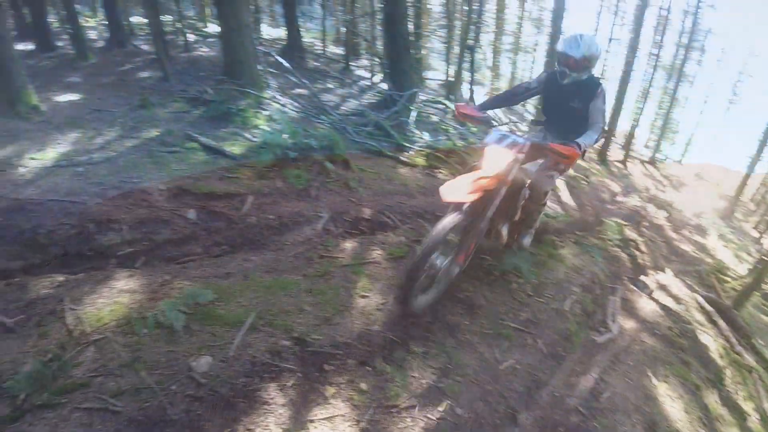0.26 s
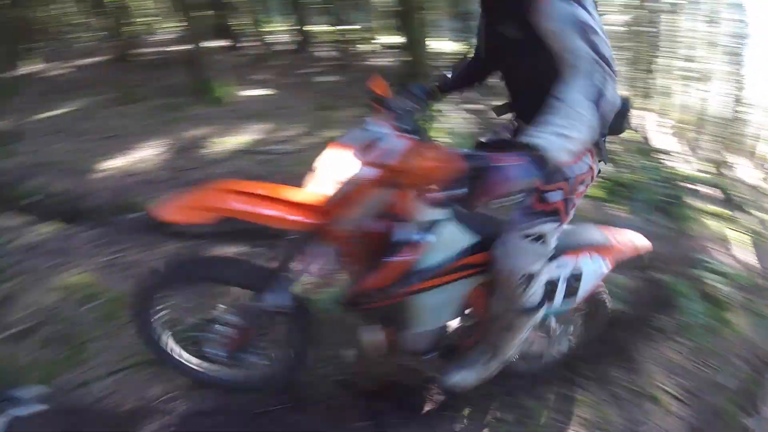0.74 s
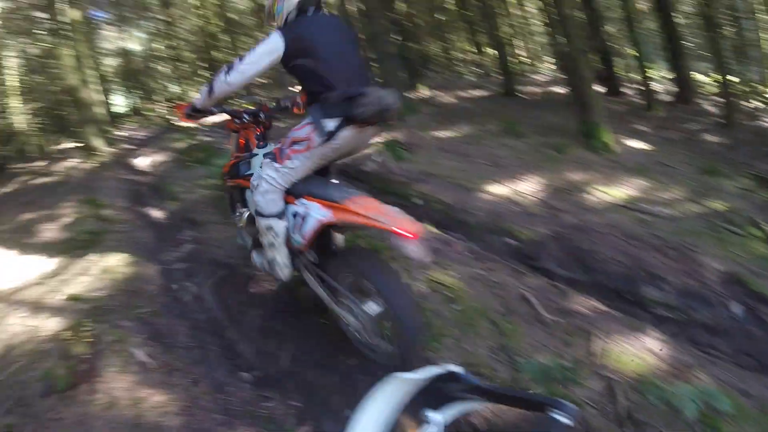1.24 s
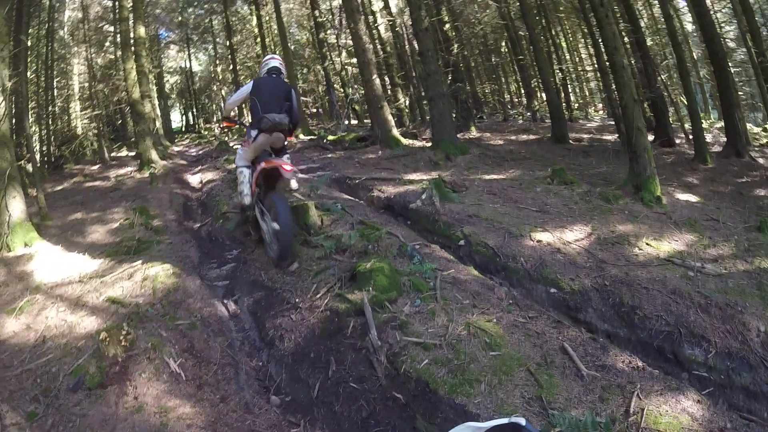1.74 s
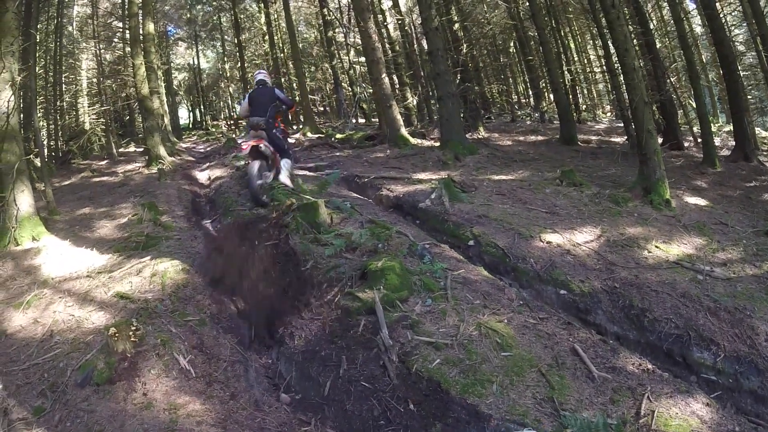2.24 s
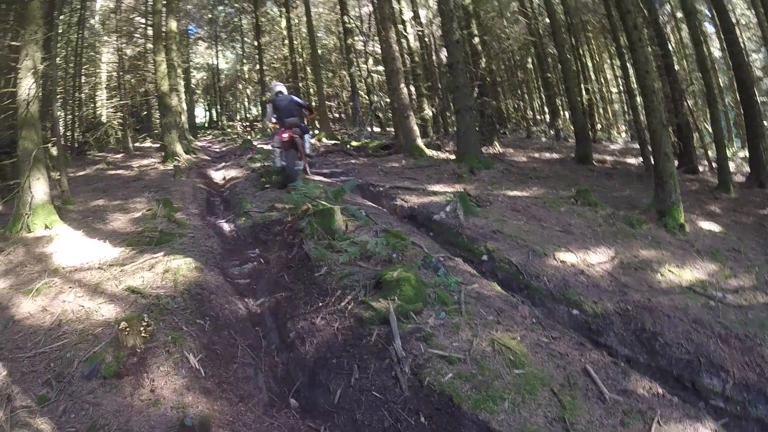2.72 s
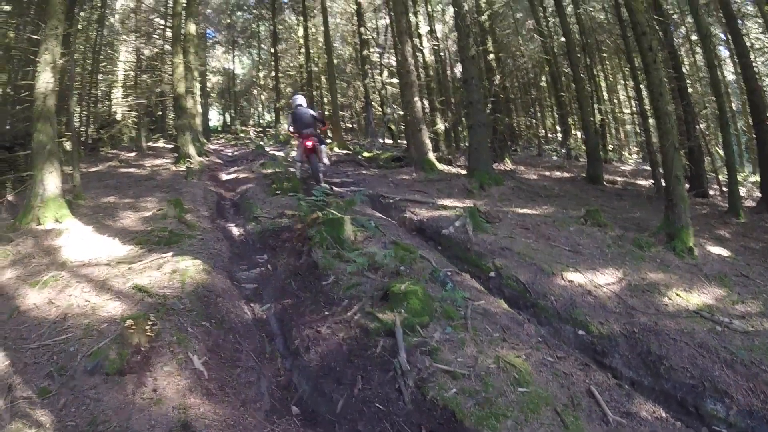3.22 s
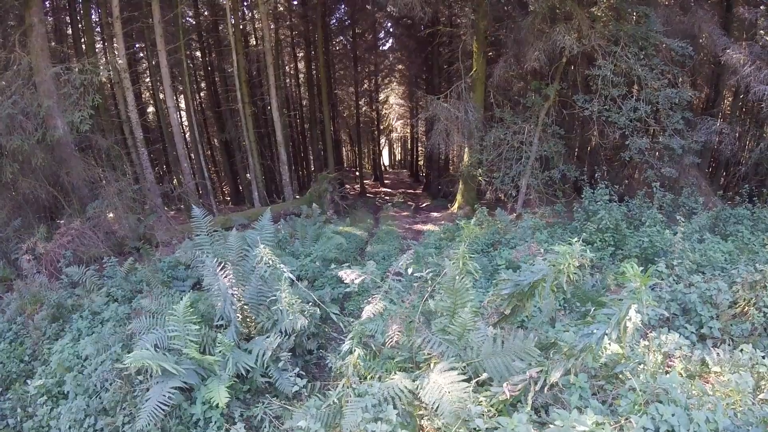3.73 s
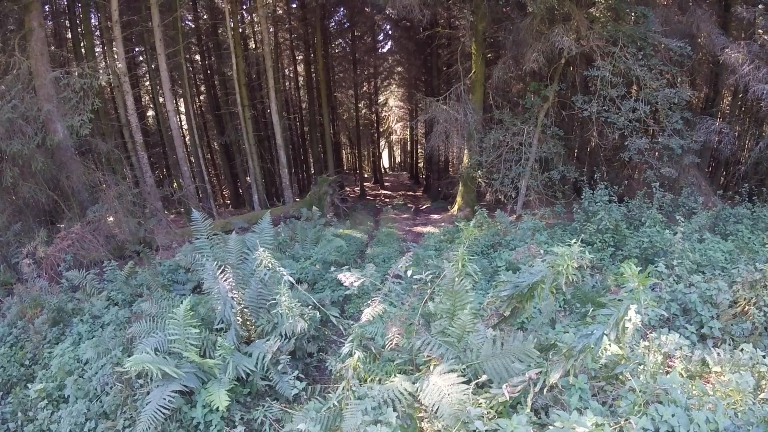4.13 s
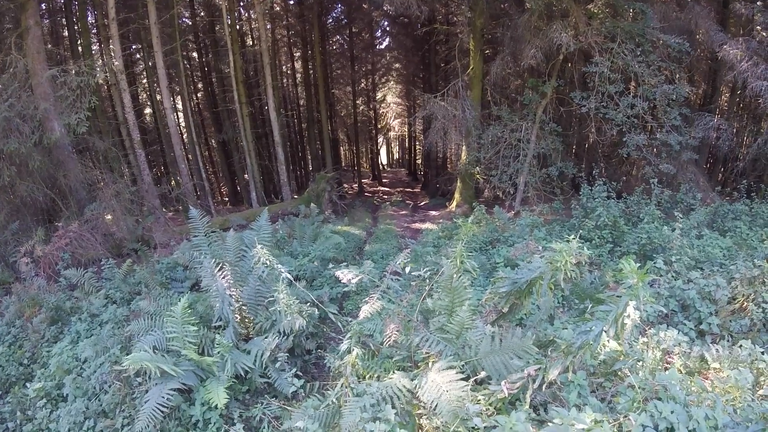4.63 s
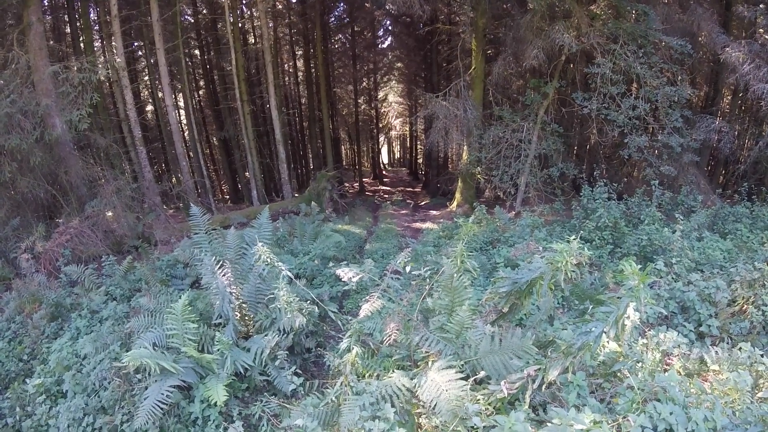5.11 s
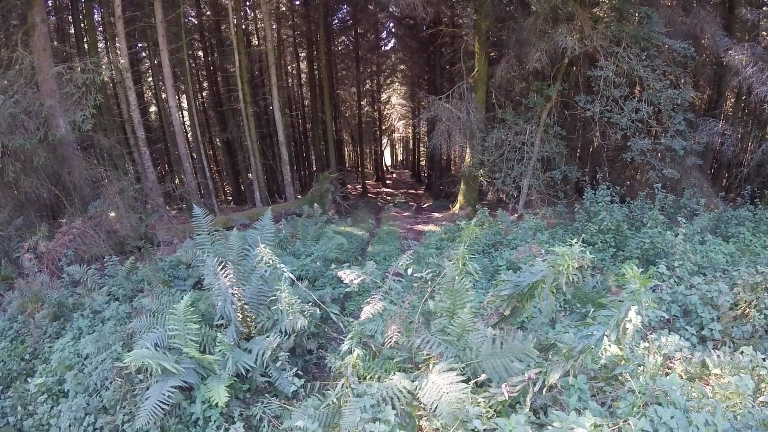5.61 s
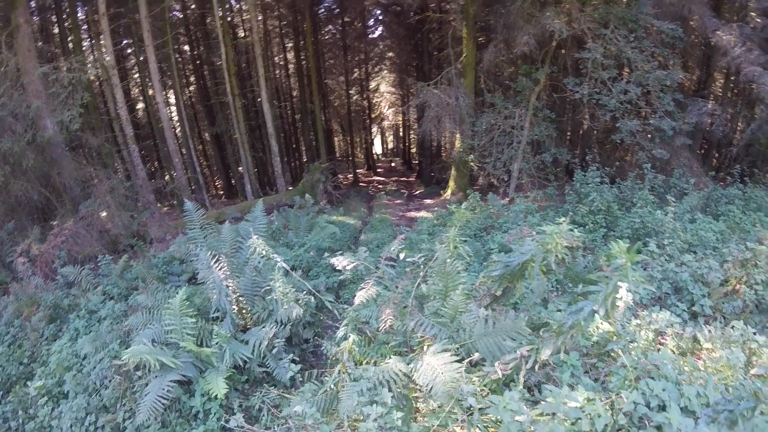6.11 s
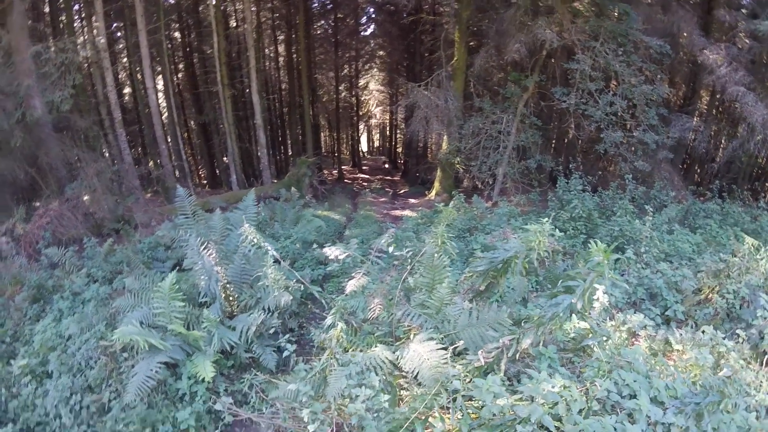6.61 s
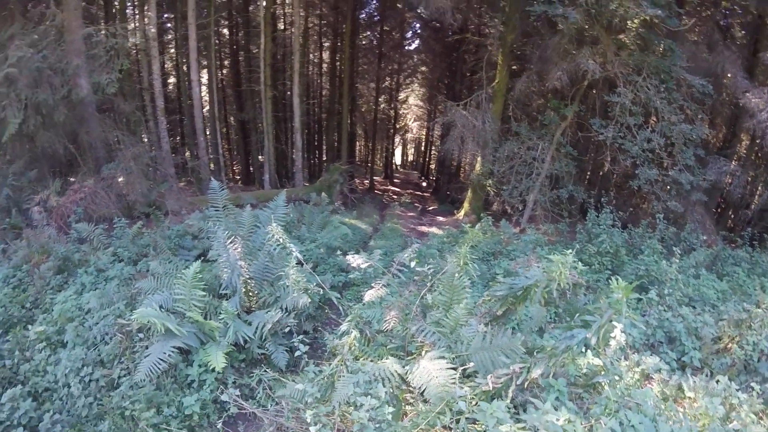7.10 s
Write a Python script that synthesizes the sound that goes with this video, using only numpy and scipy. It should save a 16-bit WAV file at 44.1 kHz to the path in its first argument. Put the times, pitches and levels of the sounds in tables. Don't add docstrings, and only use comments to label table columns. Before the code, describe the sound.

A near two-stroke engine, raspy and hollow, growls past and moves off with uneven throttle bursts, misfires and wheel-slip wobbles, with low wind bumps on the small microphone. Then an abrupt change: thin, bass-light distance, a faint muffled bike clearing as it tops a rise, rising in pitch, joined late by a second bike's two sharp revs. Trees blur everything with short dull scatter.

```python
import sys
import numpy as np
from scipy import signal
from scipy.fft import rfft, irfft
from scipy.io import wavfile

SR = 44100
rng = np.random.default_rng(int(sys.argv[2]) if len(sys.argv) > 2 else 0)


def how_loud(loudness_db):
    steps = np.asarray(loudness_db, float) / 20
    return 10 ** steps


def dump_mix(stems):
    frames = np.atleast_2d(stems).T
    limited = np.clip(frames, -1, 1)
    pcm = np.round(limited * 32767).astype(np.int16)
    wavfile.write(sys.argv[1], SR, pcm)


N = 324135
SECONDS = np.arange(N) / SR
CUT_S = 3.36
OPEN_S, SHUT_S = .025, .035


def to_db(gain):
    return 20 * np.log10(gain + 1e-6)


def rms_one(x):
    return x / np.sqrt(np.mean(x ** 2) + 1e-20)


def in_time(rows):
    s, *columns = np.transpose(rows)
    return [np.interp(SECONDS, s, c) for c in columns]


def bursts(rows, rise_s, fall_s):
    t = np.arange(0, N + 32, 32) / SR
    gains = []
    for on, off, db in rows:
        ramp = np.minimum((t - on) / rise_s, (off - t) / fall_s) + 1
        gains.append(how_loud(db) * np.clip(ramp, 0, 1) ** 2)
    return np.interp(SECONDS, t, np.max(gains, axis=0))


def drift(rate):
    low_pass = signal.butter(2, rate, fs=SR / 32, output="sos")
    slow = signal.sosfilt(low_pass, rng.standard_normal(N // 32 + 500))[498:]
    return np.interp(np.arange(N) / 32, np.arange(len(slow)), rms_one(slow))


def band(x, low_hz, high_hz, order=4):
    return signal.sosfilt(signal.butter(order, [low_hz, high_hz], "band", fs=SR, output="sos"), x)


def coloured(x, spectrum):
    hz, level_db = np.transpose(spectrum)
    grid = np.log(np.fft.rfftfreq(N, 1 / SR) + 1)
    return irfft(rfft(x) * how_loud(np.interp(grid, np.log(hz), level_db)), N)


def firings(turns, speed, spread_db):
    at = np.flatnonzero(np.diff(np.floor(turns)) > 0) + 1
    clicks = np.zeros(N)
    clicks[at] = np.sqrt(SR / speed[at]) * how_loud((spread_db * rng.standard_normal(N))[at])
    return clicks


def gate(turns, depth, sharp):
    return 1 - depth + depth * sharp * np.exp(-sharp * (turns % 1))


# time in seconds, firings per second.
NEAR_SPEED = [(0, 42.4), (.24, 42.4), (.28, 49.7), (.48, 48.5), (.54, 62.3), (.61, 52.3), (1.29, 49.6),
              (1.52, 43.1), (1.7, 57.5), (1.89, 62.1), (1.97, 70.5), (2.32, 54.5), (2.39, 56), (2.5, 75),
              (2.64, 95), (2.93, 47.4), (3.07, 36.4), (3.37, 58.7)]
# time in seconds, width in seconds, change in
WAVERS = [(.14, .05, 3), (.215, .03, -5), (.24, .03, -1.5), (.28, .03, 2), (.355, .03, -1), (.41, .025, 1.3),
          (.46, .02, -1), (.62, .03, -3), (.78, .1, 1.3), (1.04, .1, -1.2), (1.22, .045, 3.6),
          (1.35, .03, -3.5), (1.42, .07, -1.2), (1.47, .04, 2.6), (2.07, .03, 2), (2.14, .03, -2),
          (2.64, .025, -2.5), (2.74, .06, 3.2), (2.995, .03, -2), (3.07, .03, 2), (3.1, .03, -3.5),
          (3.17, .05, 3.8), (3.25, .03, -2.8)]
# time in seconds, distance in metres.
NEAR_DISTANCE = [
    (0, 3.2),
    (.25, 2.32),
    (.55, 1.41),
    (.95, 2.87),
    (1.4, 4),
    (2.05, 4.62),
    (3.36, 4.5),
]
# opens in seconds, shuts in seconds, strength in dB,
# extra ring of the chamber in dB, extra ring of the silencer in dB.
THROTTLE = [(0, 0.114, -7, -3, -6.5), (0.12, 0.37, -2, -5.5, -6), (0.215, 0.498, 0.5, -2.5, -2.5),
            (0.495, 0.656, -8, 5, 5.5), (0.677, 0.896, -3.5, 1.5, 1), (0.922, 1.275, -2.5, -1.5, -2),
            (1.289, 1.382, -4.5, -9, -1.5), (1.38, 1.489, -3, -16.5, -1.5), (1.51, 1.59, -9.5, -28, -16),
            (1.607, 1.625, -21.5, 16, 5), (1.641, 1.759, -1.5, 4, -1.5), (1.766, 1.937, -1, -0.5, -2.5),
            (1.964, 1.995, -0.5, -13, -8), (2.046, 2.145, -17, -31, -14), (2.171, 2.18, -11.5, -10, -13.5),
            (2.2, 2.252, -30, -8, 4), (2.272, 2.304, -7, 2, -4.5), (2.335, 2.362, -30, -6, 5),
            (2.379, 2.444, -1.5, -1, -8), (2.453, 2.578, -8.5, 9, 3.5), (2.58, 2.697, -9.5, 5.5, 2),
            (2.7, 2.779, -5.5, 4.5, -6.5), (2.819, 2.94, -5, -1.5, -6.5), (2.963, 3.216, -4.5, -12, -4.5),
            (3.237, 3.4, -7, -9, -12)]
# time in seconds, strength in dB against the neighbours.
ODD_FIRINGS = [(1.535, -5), (1.602, 4), (1.956, -3), (1.999, -8), (2.013, 4), (2.169, 4), (2.269, 2),
               (2.323, -4), (2.378, 2), (2.798, -13), (2.83, -2), (2.844, -13), (2.861, 3), (2.896, -3),
               (2.916, -9), (2.96, 0), (3.005, -3), (3.083, -3), (3.11, 1), (3.136, 3), (3.18, -4),
               (3.201, -11), (3.222, 5), (3.242, -3), (3.283, -3), (3.302, -5), (3.32, 0)]


def near_bike():
    speed, = in_time(NEAR_SPEED)
    for s, width, hz in WAVERS:
        speed = speed + hz * np.exp(-((SECONDS - s) / width) ** 2)
    turns = np.cumsum(speed) / SR - .24
    metres, = in_time(NEAR_DISTANCE)
    octaves = np.log2(speed / 50)
    gas = bursts([row[:3] for row in THROTTLE], OPEN_S, SHUT_S)
    chamber, ring = [bursts([(*row[:2], row[2] + row[k]) for row in THROTTLE], OPEN_S, SHUT_S)
                     for k in (3, 4)]

    reach_db = -4 - 0.24 * to_db(metres)
    shares_db = [to_db(gas + how_loud(-21)) + 1.5 * octaves,
                 to_db(chamber + how_loud(-29.5)) + 3.5 * octaves,
                 to_db(ring + how_loud(-33)) + 6.5 * octaves]
    gas_db = np.interp(SECONDS, [.5, .65, 2.76, 2.84], [-21, -27, -27, -19])

    uneven = np.maximum((gas_db + 26) / 10 * np.where(SECONDS < 1, .25, 1), .8 - 4 * gas)
    turns = turns + .025 * uneven * drift(20)
    clicks = firings(turns, speed, spread_db=.5 + 1.2 * uneven) * how_loud(reach_db)
    strength = np.ones(int(turns[-1]) + 2)
    for s, db in ODD_FIRINGS:
        strength[round(turns[round(s * SR)])] = how_loud(db)
    strength = strength[np.round(turns).astype(int).clip(0)]

    pipe = exhaust(clicks * strength, shares_db) + intake(clicks)
    flow_db = reach_db + to_db(np.sqrt(gas * ring) + how_loud(-29.5)) + gas_db
    flow = how_loud(flow_db) * rms_one(band(rng.standard_normal(N), 50, 750, order=2))
    scatter = how_loud(-18) * forest(pipe, t60=.35, dull_hz=1500)
    clatter = near_clatter(turns, speed, metres, gas, ring, strength)
    return pipe + flow + scatter + clatter * strength ** 0.026


# pitch in Hz, width in Hz, level in dB.
THUMP = [
    [(48, 30, -21), (91, 16, 24)],
    [(51.7, 85, -14), (101, 45, 13)],
    [(51.7, 48, -10), (93.5, 68, 5)],
    [(48, 33, 11), (91, 34.5, 22), (135, 25, 5)],
    [(66, 76, -17), (102, 35, -23)],
    [(58, 40, 0), (111, 38, 8)],
    [(73.5, 27, -2.5), (157, 34, 3.5)],
]
CHAMBER = [
    [(176, 24, -0.5), (200, 16, -9), (256.8, 24, 7)],
    [(153, 39, -19), (232.6, 51, 12.5), (260, 44, 9.5), (300, 21, -21)],
    [(143, 20, -5), (200, 40, 3.5), (250, 39, 8.5), (298, 21, 1.5)],
    [(232, 25, -5), (288, 100, 4)],
    [(177, 76, 1.5), (234.5, 16, -3)],
    [(182, 29, -3), (252, 91, 5), (286, 52, -4)],
    [(234, 65, -5), (280, 52, 0)],
]
SILENCER = [
    [(380, 55, 7), (464, 9.9, -1), (612, 57, 3), (750, 72, -10), (890, 47, -12)],
    [(380, 58, 5), (447, 56, 10), (568, 26, -2.5), (680, 96, 2)],
    [(406, 35, 7.5), (468, 34, 1), (597, 73, 2), (684, 37, -2)],
    [(347, 44, 12), (435, 85, 9.5), (553, 63, -5), (755, 75, -1), (950, 120, -18)],
    [(378, 76, 5), (550, 69.5, 17), (607, 63, -3.5)],
    [(399, 50, 4), (460, 44, 11), (560, 37, 4.5), (707, 45, 3.5), (921, 42, -5)],
    [(371, 40, 11), (537, 60, 0.5), (590, 49, 0), (676, 31, -1.5)],
]
# thump in dB, chamber in dB, silencer in dB.
SHARES_DB = [
    (-11.5, -6, -6),
    (-18, -0.4, -8.5),
    (-12, -0.5, -6),
    (-7, -3.5, -4.5),
    (-4.5, -7, -2.5),
    (-5.5, -10.5, -5.5),
    (1, -11.5, -2),
]
SWEEP_S = .0025, 0, 0, 0, 0, 0, .002
# time in seconds, view number (halves are blends).
VIEW = [(.44, 0), (.54, 1), (.82, 1), (.93, 2), (1.27, 2), (1.36, 3), (1.5, 3), (1.62, 5), (1.95, 5),
        (2.0, 4), (2.41, 4), (2.44, 6), (2.555, 6), (2.59, 4), (2.8, 4), (2.95, 3.5), (3.19, 3.5),
        (3.21, 4)]


def exhaust(clicks, shares_db):
    view, = in_time(VIEW)
    crests_s = [(.002, .0005, -.0015), (.002, 0, 0), (.0025, .0005, .0005), (.002, .0015, -.001),
                (.002, .0015, -.001), (.0068, .0062, 0), (.002, 0, -.003)]
    signs = [(-1, 1, -1), (-1, 1, 1), (-1, 1, 1), (-1, -1, 1), (-1, -1, 1), (-1, -1, 1), (1, 1, -1)]
    pipe, heard = np.zeros(N + 4096), int(CUT_S * SR) + 2048
    for k, bodies in enumerate(zip(THUMP, CHAMBER, SILENCER)):
        seen = np.clip(1 - np.abs(view[:heard] - k), 0, 1) ** .6
        start, stop = np.flatnonzero(seen)[[0, -1]]
        direction = -1 if k in (1, 2) else 1
        parts = zip(shares_db, SHARES_DB[k], bodies, crests_s[k], signs[k])
        for db, share_db, modes, crest_s, sign in parts:
            pulse = sign * pipe_pulse(modes, crest_s, SWEEP_S[k], direction)
            blows = clicks[start:stop] * seen[start:stop] * how_loud(db[start:stop] + share_db)
            pipe[start:stop + 4095] += signal.oaconvolve(blows, pulse)
    return signal.sosfiltfilt(signal.butter(2, 36, "high", fs=SR, output="sos"), pipe[2048:N + 2048])


def pipe_pulse(modes, peak_s, sweep_s, direction):
    pulse = 0
    for hz, width, db in modes:
        crest_s = peak_s + sweep_s * np.log2(hz / 300)
        t = direction * ((np.arange(4096) - 2048) / SR - crest_s)
        swell = np.maximum(1 + 1.5 * np.pi * width * t, 0)
        pulse = pulse + how_loud(db) * width * swell * np.exp(-swell) * np.cos(2 * np.pi * hz * t)
    return pulse / np.sqrt(np.sum(pulse ** 2))


# starts in seconds, stops in seconds, lead in seconds, level in dB.
GULPS = [
    (0.066, 0.237, .012, -20.5),
    (1.306, 1.503, 0.0059, -22),
    (2.972, 3.168, .007, -15.5),
]
# pitch in Hz, width in Hz, level in dB.
AIRBOX = [
    (120, 89, 0.5),
    (250, 90, 0),
]


def intake(clicks):
    heard, out = int(CUT_S * SR), np.zeros(N)
    for on, off, lead_s, db in GULPS:
        drawn = (clicks * bursts([(on, off, db)], OPEN_S, SHUT_S))[:heard]
        pulse = pipe_pulse(AIRBOX, -lead_s, 0, direction=1)
        out[:heard] -= signal.oaconvolve(drawn, pulse)[2048:heard + 2048]
    return out


# pitch in Hz, level in dB per Hz.
NEAR_COLOUR = [(500, -10), (850, 11.5), (914, -2), (1040, -3), (1480, -3.5), (1730, -9), (2230, -6.5),
               (2800, -18), (4320, -20), (5240, -18), (6350, -23.5), (10300, -31), (11500, -41),
               (13900, -39), (15100, -63)]
# starts in seconds, stops in seconds, pitch in Hz, width in Hz, level in dB.
NEAR_PANELS = [(.001, .04, 890, 30, -33), (0.232, .3, 950, 40, -33), (.35, .44, 940, 60, -40),
               (.41, .52, 2300, 200, -45), (.48, .545, 5160, 250, -41), (.52, .6, 1500, 200, -33),
               (.525, .58, 3300, 200, -42), (.612, .625, 1380, 200, -29), (.615, .63, 2200, 400, -33),
               (0.657, .7, 2200, 200, -37), (.76, .874, 950, 45, -25), (0.918, 1.176, 1470, 48, -33.5),
               (1.022, 1.192, 895, 31.48, -26), (1.754, 1.963, 1020, 88, -34), (1.88, 1.973, 558, 50, -33),
               (1.993, 2.113, 1480, 89, -36.5), (2.512, 2.5, 380, 60, -26)]


def near_clatter(turns, speed, metres, gas, ring, strength):
    octaves = np.log2(speed / 50)
    load_db = 0.39 * to_db(ring + how_loud(-17))
    clatter_db = -21 - to_db(metres) + load_db + 3.5 * octaves
    shut = np.clip(1 - 4 * gas, 0, 1)
    treble_db = -5.5 - 1.22 * metres - 4.5 * shut + 0.5 * octaves + 0.1 * to_db(strength)
    treble_db = treble_db + 6.5 * np.exp(-((SECONDS - 2.612) / 0.036) ** 2)
    clatter = rasp(turns + 0.17, NEAR_COLOUR, clatter_db, treble_db, 860, depth=0.61, sharp=1.15,
                   patchy_db=0.78, air_db=-28.5, still_db=-90, mid_db=0.0, mid_follows=0.68)
    echo = how_loud(-10.0) * band(forest(clatter, t60=0.57, dull_hz=2200), 875, 2200, order=2)
    return clatter + echo + panels(turns, speed, NEAR_PANELS)


# pitch in Hz, width in Hz, level in dB.
FINS = [
    (1480, 27, -24),
    (1940, 25, -15),
    (2895, 110, -5.5),
    (3590, 90, -11.5),
    (4976, 46, 1.5),
    (5306, 110, -3),
    (5540, 28, -12),
    (5876, 130, -1.5),
    (7260, 26, -12),
]


def rasp(turns, spectrum, level_db, treble_db, low_hz, depth, sharp, patchy_db, air_db, still_db,
         mid_db, mid_follows):
    noise = coloured(rng.standard_normal(N) * gate(turns, np.clip(depth, 0, 1), sharp), spectrum)
    rings = 0
    for hz, width, db in FINS:
        wander = how_loud(db + 9.1 * np.tanh(drift(7.8)))
        rings = rings + wander * signal.lfilter(*signal.iirpeak(hz, hz / width, SR), noise)
    hz, lines = np.fft.rfftfreq(N, 1 / SR), rfft(noise + rings)
    above = [1 / (1 + (edge / (hz + 1)) ** 14) for edge in (low_hz, 2400, 4500, 11300, 15250)]
    body, mid, treble, air = [rms_one(irfft(lines * (lo - hi), N)) for lo, hi in zip(above, above[1:])]
    mid = how_loud(mid_db + mid_follows * treble_db) * mid
    treble = how_loud(treble_db + .5 * drift(3.0)) * treble
    air = (how_loud(level_db + treble_db + air_db) + how_loud(still_db)) * air
    flutter = how_loud(patchy_db * drift(22.0))
    return flutter * (how_loud(level_db) * (body + mid + treble) + air)


def panels(turns, speed, rows):
    edge_s = 0.061
    clicks, out = firings(turns, speed, spread_db=0.5) + 1e-18, 0
    for on, off, hz, width, db in rows:
        shaken = clicks * bursts([(on, off, db)], edge_s, edge_s) * np.sqrt(SR / (np.pi * width))
        shaken = band(shaken + 1e-18, hz / 2, hz * 2, order=2)
        out = out + signal.lfilter(*signal.iirpeak(hz, hz / width, SR), shaken)
    return out


def second_spot():
    climber, slow = climbing_bike()
    revver, fast = revving_bike()
    yield_db = np.interp(SECONDS, [6.33, 6.42, 7.0, 7.08], [0, -18, -16, 0])
    bikes = how_loud(yield_db) * climber + revver + far_rasp(slow, fast)
    return signal.sosfilt(signal.butter(14, 129, "high", fs=SR, output="sos"), bikes)


# time in seconds, firings per second.
CLIMBER = [(3.37, 39), (3.52, 41), (3.69, 49.5), (4.16, 48.6), (4.32, 56), (4.65, 43.5), (5.0, 52.3),
           (5.11, 53.4), (5.44, 72), (5.57, 73.7), (5.7, 65), (5.8, 74.5), (5.9, 69.8), (6.05, 64.6),
           (6.28, 70.5), (6.7, 74), (6.77, 83.5), (6.83, 82), (6.9, 75), (7.05, 77), (7.19, 83), (7.35, 86)]
# time in seconds, level in dB.
CLIMBER_LEVEL = [(3.37, -43.5), (3.58, -41), (3.8, -33.5), (4.02, -41), (4.33, -34.5), (4.42, -43),
                 (4.77, -37.5), (4.9, -30.5), (5.1, -31.5), (5.28, -25), (5.4, -30.5), (5.64, -29),
                 (5.74, -27.5), (5.97, -29), (6.31, -28), (7.03, -32), (7.32, -23.5), (7.35, -41)]
# time in seconds, share of noise from 0 to 1.
CLIMBER_ROUGH = [
    (3.37, .6),
    (4.6, .5),
    (4.75, .2),
    (4.85, .04),
    (5.6, .04),
    (5.75, .08),
    (6.0, .05),
    (6.4, .05),
    (6.6, .25),
    (7.35, .1),
]
# pitch in Hz, level in dB per Hz.
FAR_PIPE = [(100, -35), (145, 0), (210, -1.5), (280, 3), (365, -4.5), (450, -18), (620, -32), (850, -37),
            (1500, -50), (3000, -66)]
HIDDEN_PIPE = [(100, -18), (150, 1), (215, 0), (280, -10), (390, -9), (470, -13), (620, -21), (850, -32),
               (1500, -46), (3000, -66)]


def climbing_bike():
    return far_bike(CLIMBER, CLIMBER_LEVEL, CLIMBER_ROUGH, FAR_PIPE, HIDDEN_PIPE)


# time in seconds, firings per second.
REVVER = [(6.3, 66), (6.38, 76), (6.422, 95), (6.49, 136), (6.53, 150), (6.56, 146), (6.59, 136),
          (6.62, 138), (6.655, 127), (6.71, 146), (6.745, 154), (6.79, 148), (6.85, 154), (6.89, 137),
          (6.95, 145), (7.015, 126), (7.05, 136), (7.2, 125)]
# time in seconds, level in dB.
REVVER_LEVEL = [(6.3, -39), (6.39, -24), (6.45, -18.5), (6.53, -16), (6.6, -21), (6.66, -20.5),
                (6.72, -15.5), (6.77, -33), (6.8, -23), (6.85, -28), (6.9, -20.5), (7.01, -24.5),
                (7.05, -34), (7.199, -27)]
# time in seconds, share of noise from 0 to 1.
REVVER_ROUGH = [
    (6.3, .02),
    (6.55, .02),
    (6.65, .04),
    (7.2, .08),
]
# pitch in Hz, level in dB per Hz.
REV_PIPE = [(100, -35), (150, 0.5), (285, 1.5), (430, -14), (540, -19), (650, -35), (820, -32),
            (1500, -14.5), (3000, -75)]


def revving_bike():
    return far_bike(REVVER, REVVER_LEVEL, REVVER_ROUGH, REV_PIPE)


def far_bike(speeds, levels, roughs, spectrum, hidden=None):
    (speed,), (level_db,), (rough,) = in_time(speeds), in_time(levels), in_time(roughs)
    turns = np.cumsum(speed * (1 + .004 * drift(12))) / SR
    gas = rng.standard_normal(N) * gate(turns, 0.49, 13.0)
    source = np.sqrt(1 - rough) * firings(turns, speed, spread_db=.7) + np.sqrt(rough) * gas
    pipe = rms_one(coloured(source, spectrum))
    if hidden:
        clear = np.interp(SECONDS, [5.12, 5.3], [0, 1])
        pipe = clear * pipe + (1 - clear) * rms_one(coloured(source, hidden))
    sounding = (SECONDS > levels[0][0]) & (SECONDS < levels[-1][0])
    direct = pipe * how_loud(level_db) * sounding
    return direct + how_loud(-15) * forest(direct, t60=.35, dull_hz=2000), turns


# opens in seconds, shuts in seconds, level in dB, treble in dB.
FAR_THROTTLE = [(3.41, 3.564, -65, 3), (3.7, 3.885, -43, -13.5), (3.984, 4.056, -47.5, -13.5),
                (4.15, 4.3, -46, -27), (4.417, 4.51, -37.5, -20), (5.14, 5.725, -39, -10.5),
                (5.758, 5.916, -33.5, -14), (5.94, 6.324, -36, -11), (6.395, 6.463, -30.5, -12),
                (6.547, 7.031, -23, -0.5), (7.095, 7.257, -29, -14), (7.27, 7.4, -31, -3.5)]
# pitch in Hz, level in dB per Hz.
FAR_COLOUR = [(250, 17), (420, 7.5), (689, -6), (825, -1.5), (987, -8.5), (2000, -4.5), (2250, -16.5),
              (2950, -19.5), (3180, -21.5), (4350, -21.5), (5130, -7.5), (6530, -16), (10100, -26.5),
              (11700, -45.5), (15100, -42.5)]
# starts in seconds, stops in seconds, pitch in Hz, width in Hz, level in dB.
FAR_PANELS = [
    (4.143, 4.19, 397, 40, -42),
    (5.43, 5.538, 870, 40, -47),
    (6.216, 6.404, 830, 45, -39.5),
    (6.557, 6.755, 790, 70, -31),
    (6.697, 6.826, 174, 35, -27),
    (7.046, 7.114, 850, 40, -33),
]


def far_rasp(slow, fast):
    open_s, shut_s = 0.23, 0.18
    turns = np.where(SECONDS > 6.42, fast, slow)
    body = bursts([row[:3] for row in FAR_THROTTLE], open_s, shut_s)
    bright = bursts([(on, off, db + top_db) for on, off, db, top_db in FAR_THROTTLE], open_s, shut_s)
    level_db = to_db(how_loud(-46.5) + body)
    treble_db = to_db(how_loud(-60) + bright) - level_db
    hiss = rasp(turns, FAR_COLOUR, level_db, treble_db, 406, depth=0.16, sharp=0.83, patchy_db=0.66,
                air_db=-39, still_db=-70.0, mid_db=-5, mid_follows=0.48)
    return hiss + panels(slow, in_time(CLIMBER)[0], FAR_PANELS)


def forest(x, t60, dull_hz):
    t = np.arange(SR // 2) / SR
    tail = band(rng.standard_normal(len(t)), 73, dull_hz, order=1) * how_loud(-60 * t / t60) * (t > .008)
    return signal.fftconvolve(x, tail / np.sqrt(np.sum(tail ** 2)))[:N]


# rises in seconds, drops in seconds, level in dB.
WIND = [
    [(.2, .5, -20), (.72, .78, -30), (3.12, 3.2, -20)],
    [(3.37, 3.4, -46), (3.5, 3.8, -62), (6.72, 7.4, -55)],
]


def wind(spot, calm_db, top_hz):
    gain = how_loud(calm_db) + bursts(WIND[spot], 0.2, 0.2)
    lumps = band(band(rng.standard_normal(N), 2.6, top_hz, order=1), 4.2, 540, order=1)
    return gain * how_loud(0.32 * drift(25.0)) * rms_one(lumps)


def scene():
    first = np.clip((CUT_S - SECONDS) / 0.0076, 0, 1)
    near = near_bike() + wind(0, calm_db=-33.5, top_hz=45)
    far = second_spot() + wind(1, calm_db=-65, top_hz=71)
    return (first * near + (first == 0) * far)[None]


def band_limit(x):
    return signal.sosfilt(signal.butter(12, 15260, fs=SR, output="sos"), x)


def record(dry):
    limited = np.tanh(dry / 1.242)
    finished = signal.sosfilt(signal.cheby2(12, 60, 15800, fs=SR, output="sos"), limited)
    return band_limit(finished)


dry = scene()
out = record(dry)
dump_mix(out)
```